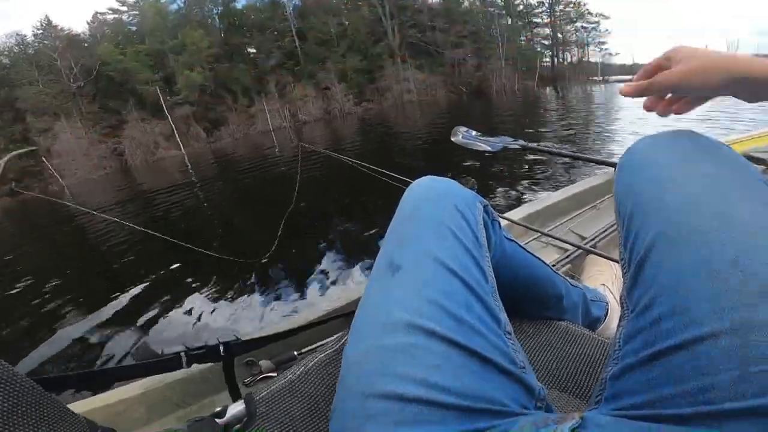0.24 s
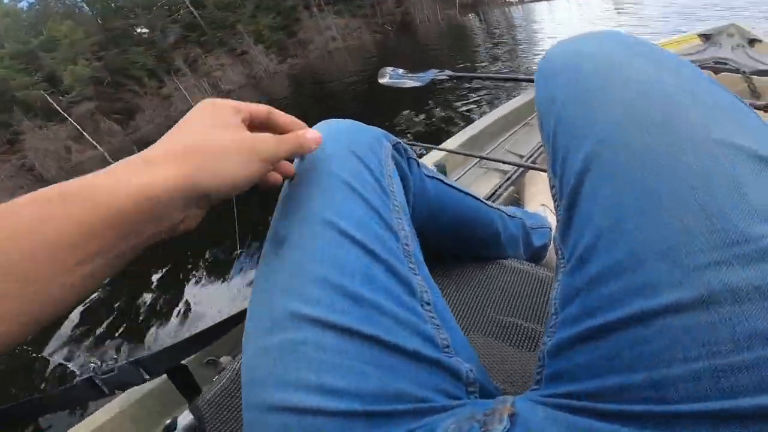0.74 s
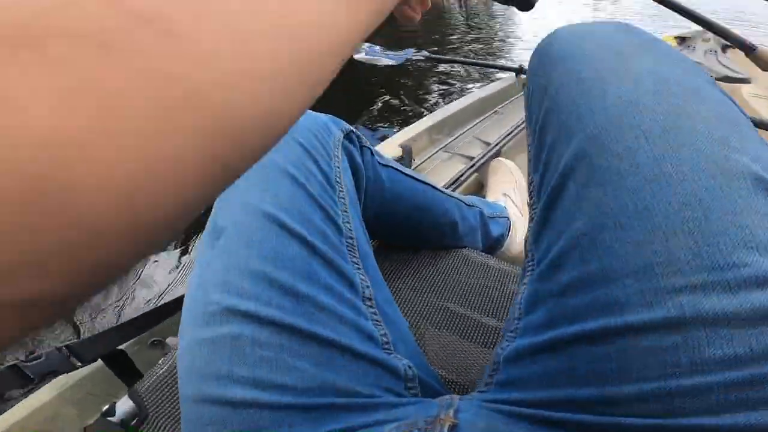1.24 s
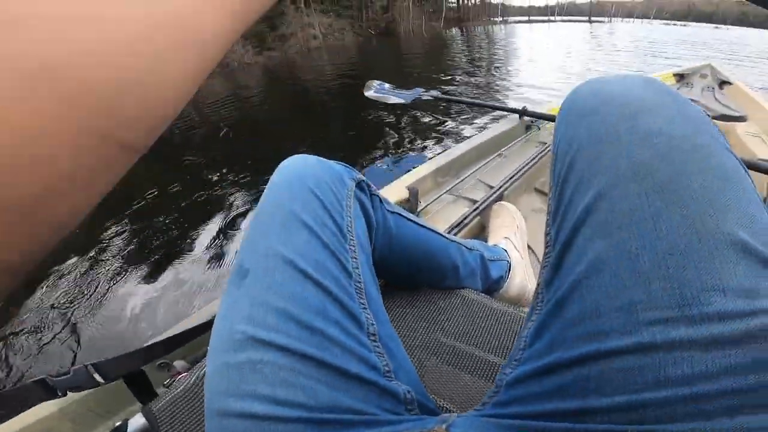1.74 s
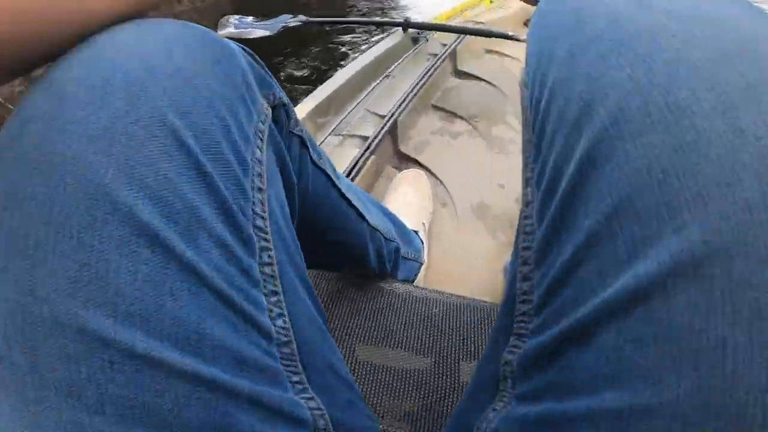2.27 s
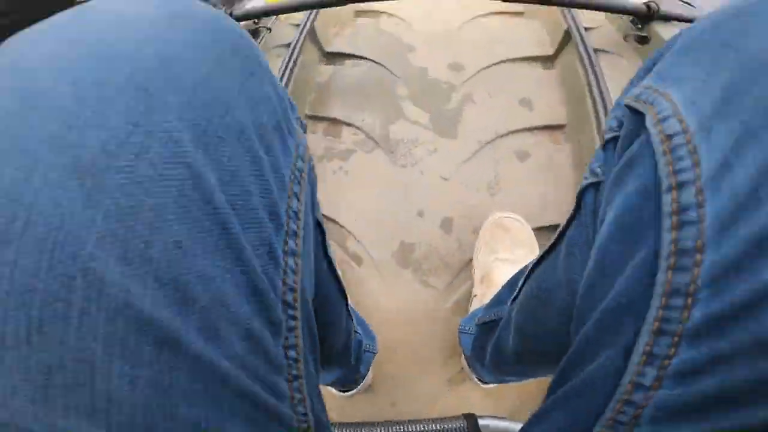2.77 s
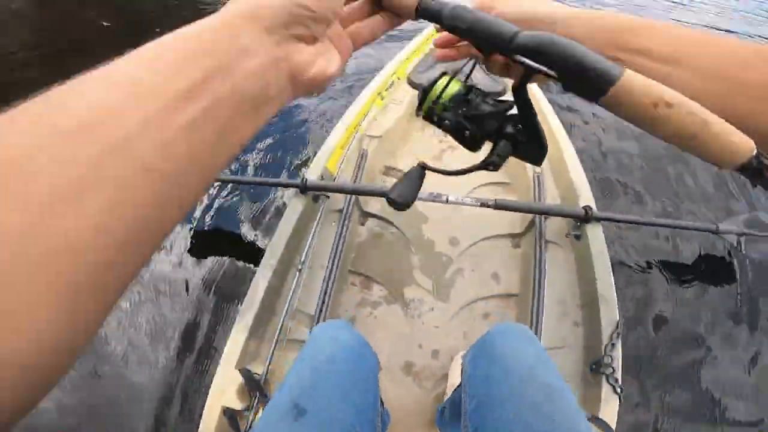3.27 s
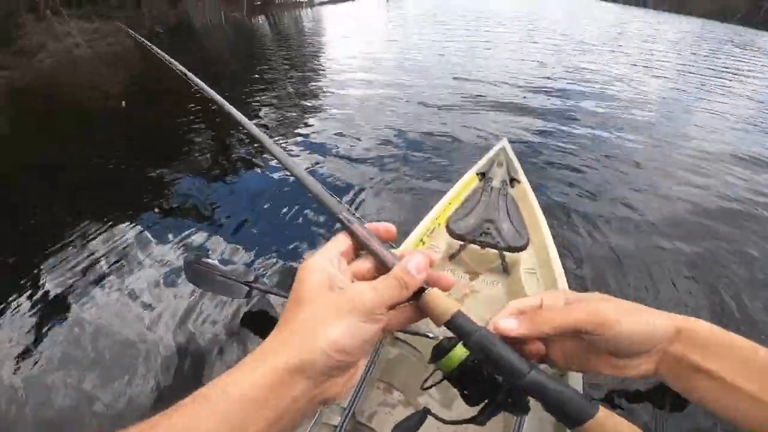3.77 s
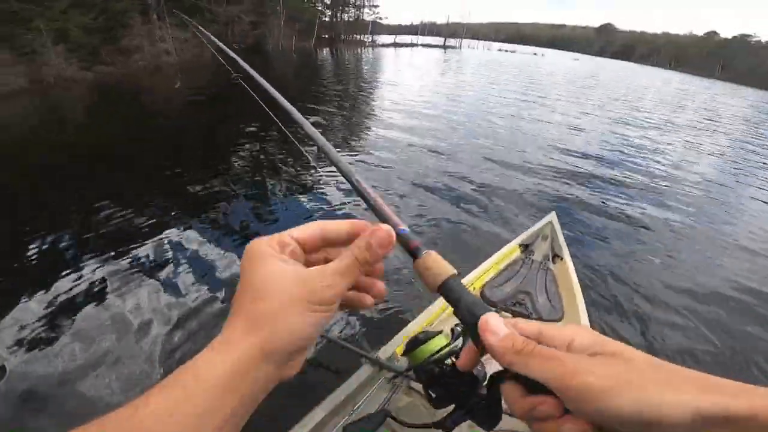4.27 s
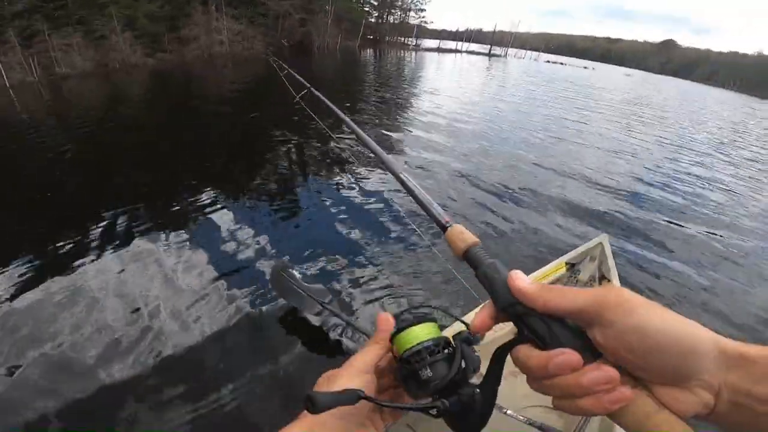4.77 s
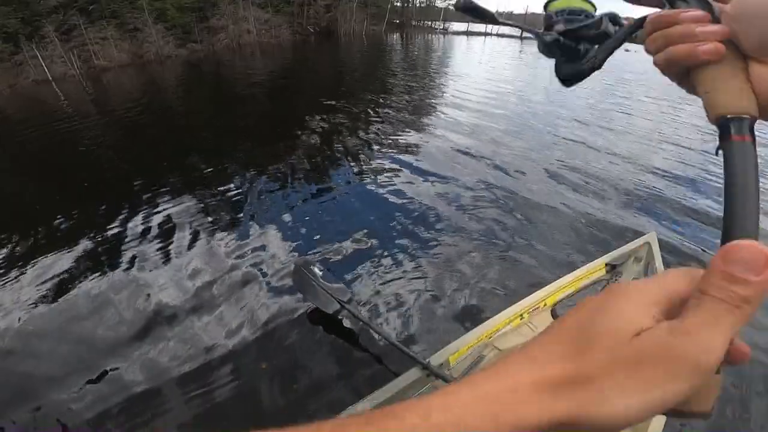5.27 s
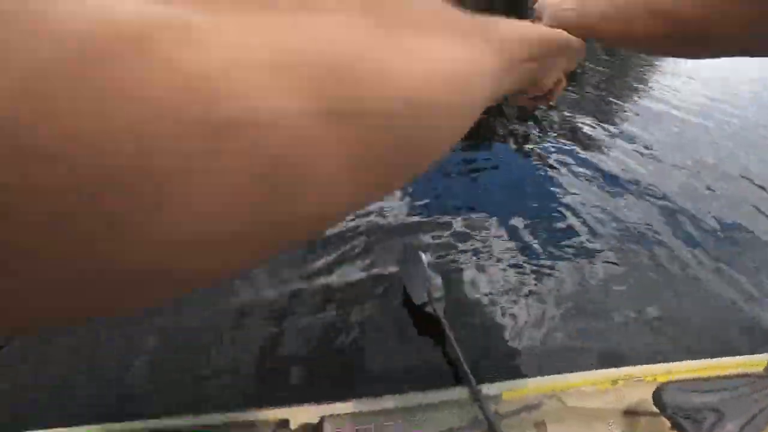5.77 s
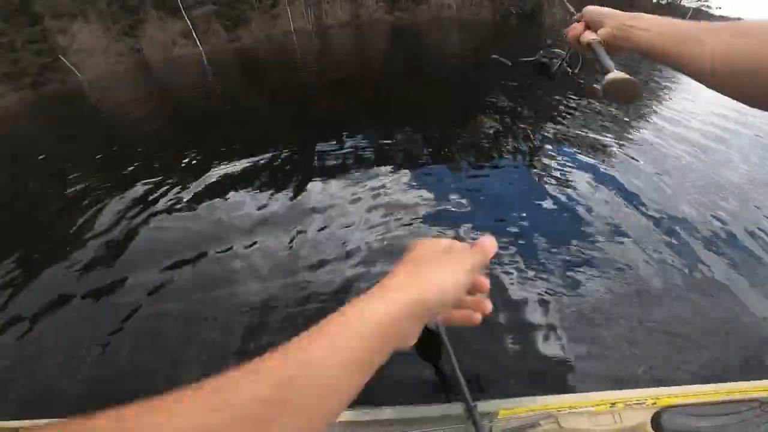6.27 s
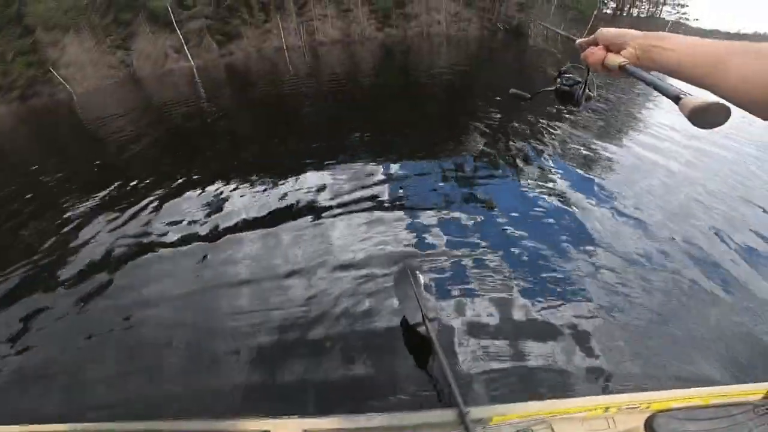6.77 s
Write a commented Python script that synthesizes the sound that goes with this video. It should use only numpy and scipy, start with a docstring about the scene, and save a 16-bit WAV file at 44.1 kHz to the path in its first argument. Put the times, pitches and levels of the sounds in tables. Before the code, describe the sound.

Gear clacks, scrapes and knocks on a hollow plastic kayak, then a fishing rod swishes and line hisses out over faint water.

```python
"""A calm lake: an angler in a plastic kayak drops a rod on the hull, swivels the seat, stands and casts.
Blows and dragging weight ring the modes of the hollow hull; knees and feet bump it, gear clacks on the rails.
Cloth, feet and seat scrape as gritty noise, the rod swishes, line ticks and hisses off the spool.
Body movement shakes a chest-worn camera mount as rumble, over a faint wash of water."""
import sys
import numpy as np
from scipy import signal
from scipy.io import wavfile

SR = 44100
rng = np.random.default_rng(int(sys.argv[2]) if len(sys.argv) > 2 else 0)


def transcribe(u):
    """Save the signal u as a 16-bit wav file named by the first command-line argument.

    u: samples, shape (n,) or (channels, n), limited to [-1, 1]; the rate is SR.
    q: integer samples, one column per channel.
    """
    v = np.clip(np.atleast_2d(u).T, -1, 1)
    q = np.round(v * 32767).astype(np.int16)
    wavfile.write(sys.argv[1], SR, q)


N = 309582

# Noise spectra. Each row: frequency in Hz, relative density in dB.
LAKE_SPECTRUM = [(35, -21), (60, -7), (210, 7.5), (486, -2.5), (829, -7.5), (1320, -4.5), (2150, -18),
                 (7720, -22.5), (12300, -48), (15500, -64)]
RUMBLE_SPECTRUM = [(11, -35), (18, -9.5), (48, 7.5), (135, -4), (200, -13.5), (260, -8.5), (440, -120)]
LINE_SPECTRUM = [(1760, 3), (3000, 7.5), (4750, 4.5), (5490, 7.5), (9320, -1), (13100, -7), (15500, -25)]
SCRAPE_SPECTRUM = [(240, -29), (400, -6.5), (466, 17.5), (552, 3), (673, 1.5), (1130, -1.5), (1470, -6.5),
                   (2360, -17), (4350, -27), (12300, -60), (15500, -77)]
# Stereo image of the noise. Each row: frequency in Hz, left-right correlation.
CORRELATION = [(25, .3), (90, .35), (250, .97), (1000, .8), (4000, .55), (9000, .3)]
# Body lurches. Each row: end of rise in seconds, hold in seconds, level in dB, tilt in dB per octave.
BODY_LURCHES = [(0.006, 0.18, -42, -5.5), (0.376, 0.088, -43.5, 0.5), (0.633, 0.28, -43, 5.5),
                (1.675, 0.13, -45, 6.5), (2.358, 0.3, -38.5, 5.5), (2.964, 0.21, -28, -0.5),
                (3.26, 0.073, -41, -1), (3.492, 0.034, -44, 1), (4.16, 0.21, -52, -4.5),
                (4.874, 0.029, -55.5, -15), (5.387, 0.016, -29.5, -2), (5.48, 0.21, -45.5, 3.5),
                (5.749, 0.16, -26.5, -2), (5.995, 0.026, -45.5, 3), (6.295, 0.027, -49, -1.5)]
# Hand pull, then cast. Each row: end of rise in seconds, hold in seconds, relative level in dB,
# hiss centre in Hz at start of hold, the same at end of hold.
PULL_AND_CAST = [(.12, 0.072, -57, 6940, 7000), (5.9, 0.62, -51, 12400, 8400)]
# Squeaks and whistles. Each row: start in seconds, length in seconds, first Hz, last Hz, level in dB.
SQUEAK_GLIDES = [(0.765, 0.028, 1234, 1180, -38), (1.093, 0.037, 1345, 1960, -39),
                 (2.238, 0.2, 5200, 4450, -46), (3.127, 0.044, 2690, 2570, -48.5),
                 (5.733, 0.012, 1330, 1280, -35), (5.83, 0.0474, 1844, 1608, -28.5),
                 (5.865, 0.015, 4240, 4370, -34), (5.886, 0.028, 970, 940, -31),
                 (5.978, 0.033, 760, 729, -42.5)]
# One turn of the seat. Each row: time in seconds, level in dB, tilt in dB per octave.
SWIVEL_CURVE = [(1.64, -47, 2.5), (1.8, -42, 6), (2.08, -35, 10), (2.17, -33.5, 10.5), (2.28, -22.5, 9),
                (2.36, -27.5, 10.5), (2.44, -45, 10.5)]
# Seat frame resonances in Hz.
SEAT_MODES_HZ = [1650, 2500, 3000, 4550]
# Strokes of cloth, feet and rod. Each row: end of rise in seconds, hold in seconds, level in dB,
# tilt in dB per octave.
SCRAPE_STROKES = [(0.382, 0.58, -53.5, 12), (1.055, 0.4, -51, 11.5), (2.47, 0.3, -39, 10),
                  (2.786, 0.026, -27.5, -1.5), (2.869, 0.2, -48.5, 10), (3.128, 0.16, -42, 4.5),
                  (3.337, 0.35, -46.5, 9), (3.658, 0.16, -36, 7), (4.3, 0.029, -47.5, 14.5),
                  (5.438, 0.59, -43.5, 8), (5.863, 0.033, -22, 8.5), (5.92, 0.2, -41.5, 9.5),
                  (6.674, 0.061, -45, 11.5)]
# Knees, feet and hands. Each row: start in seconds, level in dB, pitch in Hz, T60 in seconds.
SOFT_BUMPS = [(0.534, -50.5, 202, 0.44), (0.602, -38, 134, 0.67), (0.803, -31.5, 463, 0.21),
              (0.957, -46, 106, 0.39), (1.286, -35, 230, 0.25), (1.373, -31.5, 146, 0.3),
              (1.546, -41.5, 192, 0.47), (1.683, -33.5, 237, 0.34), (1.964, -30.5, 310, 0.93),
              (2.712, -21, 187, 0.48), (3.362, -44.5, 380, 0.18), (3.449, -39.5, 227, 0.26),
              (3.658, -42, 226, 0.57), (4, -43, 313, 0.12), (4.064, -45, 293, 0.52),
              (4.233, -39, 205, 0.24), (4.634, -45, 355, 0.25), (4.844, -43, 237, 0.33),
              (5.28, -45, 252, 0.29), (5.355, -26.5, 155, 0.34), (5.734, -34.5, 131, 0.66),
              (5.803, -34, 224, 0.093), (5.935, -32, 138, 0.053), (6.259, -37, 149, 0.37),
              (6.773, -44.5, 125, 0.2)]
# Rod, reel and seat frame. Each row: start in seconds, body level in dB, edge level in dB, body pitch in Hz.
GEAR_CLACKS = [(0.6618, -29.5, -27, 1240), (0.667, -31.5, -37, 1920), (0.7109, -55, -28.5, 1880),
               (0.725, -50, -39, 1110), (0.782, -29.5, -23.5, 1190), (0.801, -24, -60, 1210),
               (0.807, -34, -60, 3100), (0.8446, -23.5, -64, 1480), (1, -60, -38, 1180),
               (1.1062, -40, -35, 1700), (1.269, -26, -50, 1490), (1.3713, -41.5, -62, 750),
               (1.3986, -36, -65, 1300), (1.436, -37, -67, 1930), (1.543, -40.5, -40.5, 2660),
               (2.143, -25.5, -27.5, 2470), (2.1809, -14, -29.5, 1330), (2.224, -11, -16.5, 2530),
               (2.230, -11, -36, 1270), (2.2604, -22.5, -22, 1330), (2.3169, -16, -24, 2400),
               (2.4281, -8.5, -14.5, 1840), (2.485, -12.5, -17.5, 1060), (2.495, -12.5, -17.5, 1800),
               (2.5177, -13.5, -26, 1320), (2.586, -11, -29.5, 1630), (2.713, -13.5, -23.5, 1510),
               (2.729, -20.5, -40, 2220), (2.7569, -16, -45, 2340), (2.776, -22.5, -46, 3050),
               (2.8557, -12.5, -20.5, 1420), (2.8844, -10, -45, 2450), (2.9559, -26, -29.5, 1520),
               (3.029, -31.5, -51, 1470), (3.478, -39.5, -50, 1710), (4.055, -37.5, -51, 1670),
               (4.0696, -41.5, -76, 2130), (4.2348, -38.5, -71, 980), (4.273, -40.5, -50, 1430),
               (4.4632, -41.5, -47, 1360), (4.640, -36, -58, 1240), (4.671, -40, -73, 1480),
               (4.8253, -52, -35, 1470), (4.925, -36.5, -42, 2850), (4.9704, -28.5, -41, 2400),
               (4.9852, -31.5, -45, 2540), (5.280, -47, -64, 2250), (5.3644, -32, -68, 685),
               (5.468, -38, -64, 1690), (5.617, -11.5, -14, 2150), (5.624, -19.5, -40, 1080),
               (6.066, -33, -48, 1260)]
# Hull resonances. Each row: frequency in Hz, relative level in dB, nominal T60 in seconds.
HULL_MODES = [(230.5, -7.5, 0.23), (365, 4, 0.18), (533, 8, 0.03), (686, -3, 0.085), (873, -6.5, 0.082),
              (1023, -3, 0.098), (1278, -11, 0.11)]
# Weight dragging on the hull floor. Each row: end of rise in seconds, hold in seconds, level in dB.
FLOOR_DRAGS = [(2.05, 0.031, -26.5), (2.16, 0.67, -33), (2.79, 0.039, -21)]
# Blows on the hull. Each row: start in seconds, relative level in dB, shell ring gain in dB,
# tilt in dB per octave.
HULL_KNOCKS = [(0.708, -9, -4.5, 1), (0.846, -8, 1, 0), (2.182, -10.5, 5, 2.6), (2.242, -12.5, 0, 6),
               (2.297, -7.5, -3, 1.5), (2.518, -6.5, -8.5, -1), (2.585, -5, -11, -3),
               (2.715, -5.5, -12, 0.5), (2.758, -19, -15, 8.5), (2.774, -16.5, -17, 11.5),
               (2.955, -15, -3.5, -17)]


def amp(db):
    """Decibels to gain."""
    return 10 ** (np.asarray(db) / 20)


def unit_rms(x):
    """Scale to RMS 1."""
    return x / np.sqrt(np.mean(x ** 2) + 1e-20)


def at_hz(points, hz):
    """Interpolate on a log-frequency axis."""
    points_hz, values = np.transpose(points)
    return np.interp(np.log(hz), np.log(points_hz), values)


def drift(rate_hz):
    """Smooth random wander, RMS 1."""
    step = 40
    pole = np.exp(-2 * np.pi * rate_hz * step / SR)
    slow = signal.lfilter([1], [1, -2 * pole, pole * pole], rng.standard_normal(N // step + 2002))[2000:]
    return np.interp(np.arange(N) / step, np.arange(len(slow)), unit_rms(slow))


def bandpass(x, order, low_hz, high_hz):
    """Butterworth band."""
    return signal.sosfilt(signal.butter(order, [low_hz, high_hz], "band", fs=SR, output="sos"), x)


def resonance(x, hz, q):
    """Resonant band, unity gain at its centre."""
    return signal.lfilter(*signal.iirpeak(hz, q, SR), x)


def ring(x, hz, t60_s):
    """One mode: a unit click starts a decaying unit sine."""
    pole, angle = amp(-60 / (t60_s * SR)), 2 * np.pi * hz / SR
    return signal.lfilter([0, np.sin(angle)], [1, -2 * pole * np.cos(angle), pole * pole], x + 1e-18)


def decays(clicks, t60_s):
    """Give each click an exponential tail."""
    return signal.lfilter([1], [1, -amp(-60 / (t60_s * SR))], clicks + 1e-18)


def stereo(mid, side, correlation):
    """Left and right from a shared and an opposed part."""
    return (np.sqrt(1 + correlation) * mid + np.sqrt(1 - correlation) * side * [[1], [-1]]) / np.sqrt(2)


def banded_noise(spectrum, flicker_db, grain_db=0, colour_db=lambda hz: 0):
    """Stereo noise in flickering third octaves; grain adds grit, colour_db reshapes it over time."""
    edges_hz = 20 * 2 ** np.arange(0, 10, 1 / 3)
    white = rng.standard_normal((2, 2, N)) * amp(grain_db * drift(110))
    shared_flicker, bands, power = drift(38), [], 0
    for k, (low_hz, high_hz) in enumerate(zip(edges_hz, edges_hz[1:])):
        hz = np.sqrt(low_hz * high_hz)
        if spectrum[0][0] < hz < spectrum[-1][0] * 1.1:
            mid, side = bandpass(white[k % 2], 2, low_hz, high_hz)
            band = amp(at_hz(spectrum, hz)) * stereo(mid, side, at_hz(CORRELATION, hz))
            power += np.mean(band ** 2)
            bands.append(band * amp(flicker_db * (shared_flicker + drift(15)) + colour_db(hz)))
    return sum(bands) / np.sqrt(power)


def swell_db(full_s, hold_s, level_db, rise_db_per_s, fall_db_per_s):
    """Envelope of one movement: rise, hold, fall."""
    t = np.arange(N) / SR
    before_s, after_s = np.maximum(full_s - t, 0), np.maximum(t - full_s - hold_s, 0)
    return level_db - rise_db_per_s * before_s - fall_db_per_s * after_s


def blend(levels_db, tilts):
    """Gain and tilt of overlapping movements: powers add, the louder weighs more in the tilt."""
    powers = amp(2 * np.maximum(levels_db, -120))
    total = powers.sum(axis=0)
    return np.sqrt(total), sum(power * tilt for power, tilt in zip(powers, tilts)) / total


def lake(level_db=-57):
    """Faint wash of calm water."""
    return amp(level_db) * banded_noise(LAKE_SPECTRUM, flicker_db=1.7)


def mount_rumble(rise_db_per_s=483, fall_db_per_s=177):
    """Each lurch shakes the chest mount: lumpy low noise."""
    levels_db = [swell_db(*row[:3], rise_db_per_s, fall_db_per_s) for row in BODY_LURCHES]
    gain, tilt = blend(levels_db, [row[3] for row in BODY_LURCHES])
    noise = banded_noise(RUMBLE_SPECTRUM, flicker_db=1.8, colour_db=lambda hz: tilt * np.log2(hz / 50))
    return gain * noise * amp([[-1], [1]])


def line_hiss(rise_db_per_s=300, hump_db=11, width_octaves=0.26):
    """Line runs through fingers and rod rings; the hiss sinks as the cast slows."""
    pull, cast = PULL_AND_CAST
    t = np.arange(N) / SR

    def glide_hz(full_s, hold_s, _, first_hz, last_hz):
        return first_hz * (last_hz / first_hz) ** (np.maximum(t - full_s, 0) / hold_s)

    pull_db = swell_db(*pull[:3], rise_db_per_s, fall_db_per_s=400)
    cast_db = swell_db(*cast[:3], rise_db_per_s, fall_db_per_s=25)
    centre_hz = np.where(t < cast[0] - 1, glide_hz(*pull), glide_hz(*cast))
    hump = lambda hz: hump_db * np.exp(-(np.log2(hz / centre_hz) / width_octaves) ** 2)
    hiss = banded_noise(LINE_SPECTRUM, flicker_db=1.2, colour_db=hump)
    return amp(np.maximum(pull_db, cast_db) - 10.5) * hiss


def line_ticks(start_s=0.88, end_s=1.5, ticks_per_s=25):
    """Line and hook tick at random as fingers untangle them."""
    t = np.arange(N) / SR
    chance = ticks_per_s / SR * ((t > start_s) & (t < end_s))
    clicks = (rng.random(N) < chance) * amp(rng.uniform(-8, 0, N))
    bursts = decays(clicks, t60_s=0.006) * rng.standard_normal((2, N))
    return amp(-38.5) * bandpass(stereo(*bursts, 0.86), 2, 4500, 8500)


def squeaks():
    """Stick-slip rubs and air round the rod tip: short, rough, wavering glides."""
    out, roughness = np.zeros(N), amp(5 * drift(300))
    waver = 1 + 0.05 * drift(150)
    for start_s, length_s, first_hz, last_hz, level_db in SQUEAK_GLIDES:
        i, count = round(start_s * SR), round(length_s * SR)
        pitch_hz = np.linspace(first_hz, last_hz, count) * waver[i:i + count]
        out[i:i + count] += amp(level_db) * np.hanning(count) * np.sin(2 * np.pi * np.cumsum(pitch_hz) / SR)
    return out * roughness


def seat_swivel():
    """Level in dB and tilt of the turning seat, with 20 ms fades at both ends."""
    t = np.arange(N) / SR
    times_s, levels_db, tilts = np.transpose(SWIVEL_CURVE)
    padded_s = np.r_[times_s[0] - 0.02, times_s, times_s[-1] + 0.02]
    return np.interp(t, padded_s, np.r_[-100, levels_db, -100]), np.interp(t, times_s, tilts)


def scrapes(rise_db_per_s=358, fall_db_per_s=239, stands_up_s=3.36):
    """Friction noise of seat, cloth, feet and rod; the seat frame rings from swivel to standing up."""
    t = np.arange(N) / SR
    seat_db, seat_tilt = seat_swivel()
    strokes_db = [swell_db(*row[:3], rise_db_per_s, fall_db_per_s) for row in SCRAPE_STROKES]
    gain, tilt = blend([seat_db] + strokes_db, [seat_tilt] + [row[3] for row in SCRAPE_STROKES])
    colour_db = lambda hz: tilt * np.log2(hz / 2000)
    noise = banded_noise(SCRAPE_SPECTRUM, flicker_db=1.0, grain_db=1.6, colour_db=colour_db)
    frame_rings = (t > SWIVEL_CURVE[0][0]) & (t < stands_up_s)
    for hz in SEAT_MODES_HZ:
        boost_db = 5.5 + 3.5 * drift(5.4)
        noise = noise + frame_rings * (amp(boost_db) - 1) * resonance(noise, hz, q=25)
    return gain * noise


def bumps():
    """Padded contacts: low noise bursts, the hull answering near one pitch."""
    age_s = np.arange(12000) / SR
    out = np.zeros((2, N + len(age_s)))
    for start_s, level_db, hz, t60_s in SOFT_BUMPS:
        envelope = np.minimum(age_s / (0.0054 * t60_s), 1) * amp(-60 * age_s / t60_s)
        mid, side = rng.standard_normal((2, len(age_s))) * envelope
        thud = bandpass(stereo(mid, side, 0.99), 3, hz / 3.7, hz * 1.905)
        thud += 1.2 * resonance(thud, hz, q=4)
        onset_rms = np.sqrt(np.mean(thud[:, :1500] ** 2))
        i = round(start_s * SR)
        out[:, i:i + len(age_s)] += amp(level_db) * thud / onset_rms
    return out[:, :N]


def contact_burst(crunch, ring_s, tail_gain, order, band_hz, modes_hz):
    """One hard contact: noise chatters briefly, then dies, coloured by three random resonances."""
    age = np.arange(len(crunch)) / (SR * ring_s)   # in ring times
    dying = np.maximum(age - 0.11, 0)
    envelope = np.minimum(age / 0.034, 1) * (amp(-60 * dying) + tail_gain * amp(-20 * dying))
    burst = bandpass(rng.standard_normal(len(age)) * envelope * crunch, order, *band_hz)
    for hz in modes_hz:
        burst += 0.4 * resonance(burst, hz, q=8)
    return burst


def clacks(length=4000):
    """Gear strikes the rails: a pitched plastic body and a bright edge that dies faster."""
    out = np.zeros((2, N + length))
    mode_ratios = 2.2 ** rng.random((len(GEAR_CLACKS), 3))
    crunch = np.pad(amp(2.8 * drift(250)), (0, length), "edge")   # uneven contact
    for (start_s, body_db, edge_db, body_hz), ratios in zip(GEAR_CLACKS, mode_ratios):
        i = round(start_s * SR)
        span = slice(i, i + length)
        ring_s = 0.035 * amp(0.14 * (body_db + 15))   # light touches die sooner
        body = contact_burst(crunch[span], ring_s, tail_gain=0.15, order=4,
                             band_hz=(body_hz / 6.2, body_hz * 2.29), modes_hz=0.693 * body_hz * ratios)
        body += 1.3 * resonance(body, body_hz, q=6)
        edge = contact_burst(crunch[span], 0.59 * ring_s, tail_gain=0.03, order=3,
                             band_hz=(3900, 10800), modes_hz=3500 * ratios)
        for burst, level_db, left_db in (body, body_db, 1.5), (edge, edge_db, 4.5):
            pan = amp([[left_db / 2], [-left_db / 2]])
            out[:, span] += amp(level_db) * pan * burst / np.abs(burst).max()
    return out[:, :N]


def hull(detune=0.022, standing_db=-63):
    """Blows ring the hull modes and rattle loose gear; shifting weight rubs the same modes."""
    start_s, knock_db, shell_db, tilt = np.transpose(HULL_KNOCKS)
    starts = np.round(start_s * SR).astype(int)
    scatter = rng.standard_normal((len(starts), len(HULL_MODES), 2))
    blows, rubbed, age_s = np.zeros(N), np.zeros(N), np.arange(12000) / SR
    friction = rng.standard_normal(N) * amp(2.5 * drift(30))
    damped_sine = lambda hz, t60_s: amp(-60 * age_s / t60_s) * np.sin(2 * np.pi * hz * age_s)
    for k, (hz, mode_db, t60_s) in enumerate(HULL_MODES):
        clicks = np.zeros(N)
        clicks[starts] = amp(knock_db + mode_db - 11.5 + tilt * np.log2(hz / 360) + 1.5 * scatter[:, k, 0])
        shifts = 1 + detune * scatter[:, k, 1]   # each struck spot shifts the mode
        for i, ring_db, shift in zip(starts, shell_db, shifts):
            spot = 0.8 * damped_sine(1.13 * hz * shift, 0.38 * t60_s)
            shell = amp(ring_db) * damped_sine(hz * shift, 0.72 * t60_s)
            blows[i:i + len(age_s)] += clicks[i] * (spot + shell) * (-1) ** k
        rattle = 0.035 * decays(clicks, t60_s=0.09) * friction
        blows += ring(rattle, hz, 0.75 * t60_s)
        rubbed += amp(mode_db) * unit_rms(ring(friction, hz, 0.43 * t60_s))
    drags_db = [swell_db(*row, rise_db_per_s=169, fall_db_per_s=125) for row in FLOOR_DRAGS]
    rub_db = np.maximum(np.max(drags_db, axis=0), standing_db)   # the angler is never fully still
    sound = blows + amp(rub_db) * unit_rms(rubbed)
    far_wall = np.roll(signal.lfilter([1, -1], [1, -0.9], sound), 9)   # the sides radiate unevenly
    return (sound + 0.41 * far_wall * [[1], [-1]]) * amp([[-0.9], [0.9]])


def scene():
    """Kayak, angler and gear over the lake."""
    water = lake()
    gear = clacks() + line_ticks() + squeaks() + line_hiss()
    return water + gear + hull() + bumps() + scrapes() + mount_rumble()


def record(dry, ceiling=0.7, cutoff_hz=16400):
    """Left channel just over a sample late and slightly duller; soft clip, then low-pass."""
    skewed = np.array([signal.lfilter([0, 0.65, 0.35], 1, dry[0]), dry[1]])
    rounded = ceiling * np.tanh(skewed / ceiling)
    return signal.sosfilt(signal.cheby2(12, 70, cutoff_hz, fs=SR, output="sos"), rounded)


dry = scene()
out = record(dry)
transcribe(out)
```